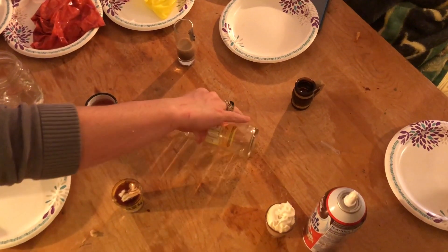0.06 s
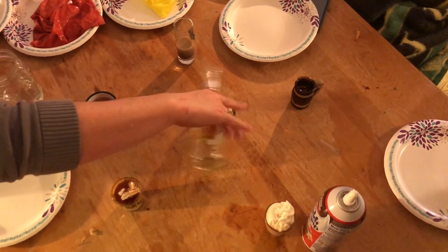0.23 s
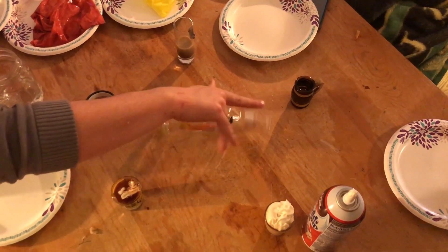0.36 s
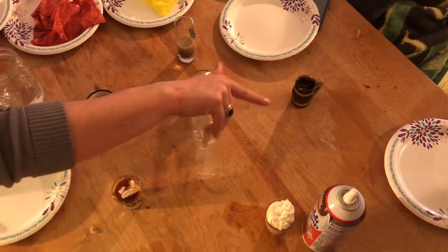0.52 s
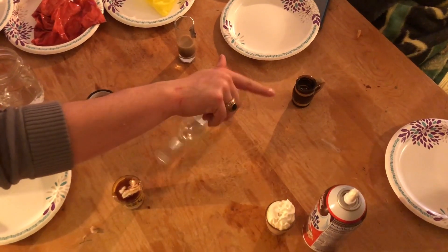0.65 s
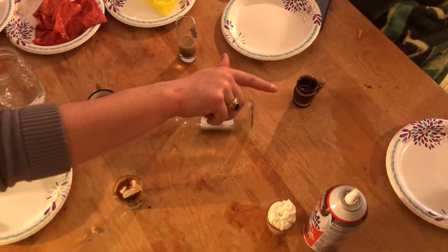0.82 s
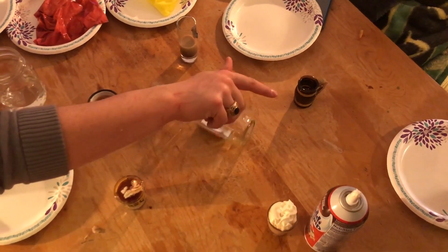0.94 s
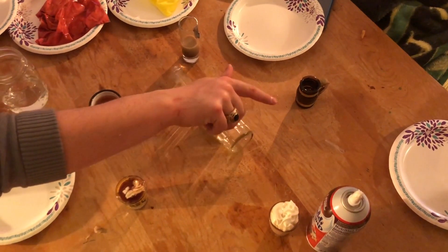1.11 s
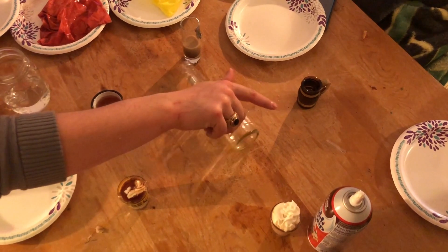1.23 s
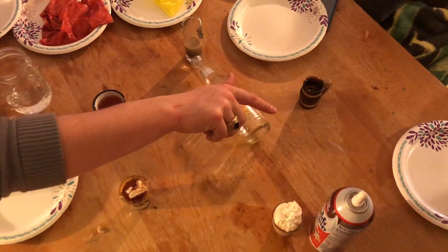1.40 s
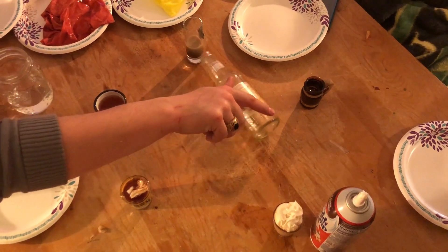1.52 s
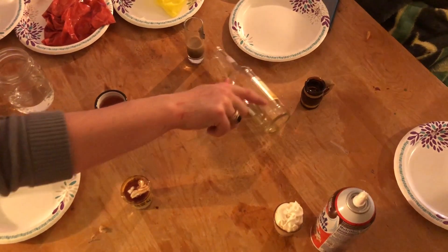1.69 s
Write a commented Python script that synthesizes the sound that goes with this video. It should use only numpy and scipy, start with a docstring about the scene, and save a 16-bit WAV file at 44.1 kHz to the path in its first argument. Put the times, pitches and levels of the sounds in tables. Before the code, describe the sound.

A glass bottle spins on its side on a wooden table, heard close in mono. After a nearly silent 0.2 seconds, a hollow woody rumble bursts in with dense irregular knocks, dry scraping and faint high glass ticks, strongest from 0.27 to 0.85. It weakens around 0.95 to 1.1, then nearly stops; soft low rocking bumps return near 1.4 and 1.6 over quiet room hush.

```python
"""Bottle spinning on a table

A glass bottle spins on its side on a wooden table in a quiet room, heard close by on one microphone.
Tiny bumps of the contact shake the tabletop's modes into a rumble and make the glass ring faintly
in close pairs and groups; grit scrapes and fizzes under it. Harder knocks and ticks, short clicks into
the same modes with a burst of noise, stand out, and the bottle rocks on softly as it slows."""
import sys
import numpy as np
from scipy import signal
from scipy.fft import rfft, irfft
from scipy.io import wavfile

SR = 44100
rng = np.random.default_rng(int(sys.argv[2]) if len(sys.argv) > 2 else 0)


def amplitude_ratio(level_db):
    """Convert a level in decibels to the matching linear amplitude (field) ratio."""
    exponent = np.asarray(level_db, float) / 20
    return 10 ** exponent


def generate_wav(signal):
    """Clip the signal to [-1, 1] and save it as 16-bit WAV at the path in sys.argv[1]."""
    frames = np.transpose(np.atleast_2d(signal))
    scaled = np.clip(frames, -1, 1) * 32767
    pcm = np.round(scaled).astype(np.int16)
    wavfile.write(sys.argv[1], SR, pcm)


N = 77175  # samples, 1.75 s


def evened(x):
    """Scales a signal to rms 1."""
    return x / np.sqrt(np.mean(x ** 2) + 1e-20)


def curve(table, col):
    """Gain over time from a dB column, straight lines in dB between rows."""
    rows = np.array(table)
    return amplitude_ratio(np.interp(np.arange(N) / SR, rows[:, 0], rows[:, col]))


def resonate(x, hz, width):
    """Two-pole resonance, bandwidth in Hz, whose ring starts with amplitude 1 for a unit click."""
    r = np.exp(-np.pi * width / SR)
    w = 2 * np.pi * hz / SR
    return signal.lfilter([0, np.sin(w) * r], [1, -2 * r * np.cos(w), r * r], x)


def bandpass(x, order, hz):
    """Butterworth band between two frequencies."""
    return signal.sosfilt(signal.butter(order, hz, "band", fs=SR, output="sos"), x)


def coloured(x, points):
    """Filters x by a spectrum drawn through (Hz, dB) points on a log frequency axis."""
    f, db = np.transpose(points)
    log_f = np.log(np.fft.rfftfreq(N, 1 / SR) + 1)
    return irfft(rfft(x) * amplitude_ratio(np.interp(log_f, np.log(f + 1), db)), N)


def bumps(per_s, spread_db):
    """Sparse clicks at random times, of random sign, a few of them large; rms 1."""
    size = amplitude_ratio(spread_db * np.minimum(rng.exponential(1, N), 3))
    sign = rng.choice([-1., 1.], N)
    return evened(size * sign * (rng.random(N) < per_s / SR))


def drift(db, hz):
    """Wandering gain of mean power 1: swings of db rms, no faster than hz."""
    t = np.arange(0, N + 128, 128) / SR
    wave = sum(np.sin(2 * np.pi * (f * t + rng.random())) for f in np.geomspace(hz / 4, hz, num=12))
    return evened(amplitude_ratio(db * np.interp(np.arange(N) / SR, t, evened(wave))))


def hits(table, col=None):
    """One click for each (s, dB) row, its dB raised by column col if given."""
    out = np.zeros(N)
    for row in table:
        out[round(row[0] * SR)] = amplitude_ratio(row[1] + (row[col] if col else 0))
    return out


def burst(db, t60, hz):
    """Noise that dies away by 60 dB in t60 s; db is its starting level before the part outside hz is cut."""
    t = np.arange(3000) / SR
    return bandpass(rng.standard_normal(len(t)), 4, hz) * amplitude_ratio(db - 60 * t / t60)


def noise_bursts(clicks, db, t60, hz):
    """A fresh noise burst at each (s, dB) click."""
    return sum(signal.oaconvolve(hits([click]), burst(db, t60, hz))[:N] for click in clicks)


# Hush of the empty room at the microphone, relative spectrum: f/Hz, level/dB
ROOM_SPECTRUM = [(25, -17), (105, 4.5), (369, -0.5), (479, 1), (800, -14), (2200, -17.5), (4910, -25.5),
                 (15500, -38)]


def room_hush():
    """Steady noise of the quiet room, -55 dB rms."""
    return amplitude_ratio(-55) * evened(coloured(rng.standard_normal(N), ROOM_SPECTRUM))


# Rolling contact on the wood: t/s, favoured rumble pitch f/Hz, then drive level/dB of
# rumble 200-400 Hz, boards 400-900 Hz, hard contact 900-2000 Hz, scrape, sharp board mode
ROLL_LEVELS = [(0.0, 295, -53, -45, -65, -64, -52), (0.106, 324, -76, -74, -68, -84, -71),
               (0.185, 318, -42.5, -41.5, -54, -56.5, -72), (0.213, 306, -39.5, -46, -42, -48.5, -29),
               (0.272, 295, -28.5, -25.5, -33, -48.5, -30.5), (0.34, 259, -29, -32, -31, -56.5, -45),
               (0.4, 298, -27, -31, -39.5, -51.5, -35), (0.445, 270, -27, -30, -44, -56, -40.5),
               (0.506, 314, -32, -30.5, -46, -47.5, -22), (0.536, 310, -25, -29, -28, -52, -28.5),
               (0.574, 305, -47, -42, -33.5, -46, -32), (0.598, 310, -27.5, -43, -34, -36.5, -38),
               (0.652, 289, -29.5, -33, -33.5, -50, -44), (0.726, 259, -25.5, -34.5, -35.5, -58, -34),
               (0.765, 280, -25, -32, -47, -49, -49), (0.818, 244, -23, -28, -36.5, -77, -37),
               (0.872, 286, -35.5, -38, -55, -64, -65), (0.978, 342, -33, -38, -42.5, -59, -68),
               (1.03, 336, -36.5, -41, -58, -65, -66), (1.09, 317, -44, -46, -54.5, -63.5, -53),
               (1.276, 274, -53.5, -62, -65.5, -73, -70), (1.39, 262, -32, -60, -53, -63, -50),
               (1.45, 269, -50.5, -53.5, -62, -72, -74), (1.53, 275, -41.5, -62, -61, -72, -79),
               (1.584, 250, -40, -58, -69, -69, -64), (1.628, 287, -45.5, -52, -66, -67.5, -59),
               (1.75, 248, -39, -62.5, -75, -66.5, -54)]
# Knocks of bottle on wood, before each part's own trim: t/s, level/dB, hard part relative to it level/dB
KNOCK_HITS = [(0.201, -27.5, 0), (0.215, -18, -19), (0.26, -21.5, -18), (0.312, -15, -6.5),
              (0.37, -27.5, -22), (0.409, -20, -9), (0.452, -19, -15.5), (0.517, -15.5, -16),
              (0.531, -13.5, -6), (0.548, -31.5, 5), (0.557, -24, 0.5), (0.584, -22.5, 2),
              (0.605, -25.5, -14), (0.626, -30, 7.5), (0.643, -18, -8), (0.732, -20, -5),
              (0.793, -21, -1.5), (0.946, -24, -10), (1.361, -30.5, -12), (1.399, -32, -18)]
# Tabletop modes, deep to hard and one sharp: f/Hz, width f/Hz, relative level/dB
BASS_MODES = [(105.3, 25, 0), (165.3, 11, 0.01)]
RUMBLE_MODES = [(241, 20, -2), (268, 24, 0), (292, 24, 0), (320, 22, 0), (352, 26, -2)]
BOARD_MODES = [(430, 34, -15), (541, 23, -0.5), (578.3, 23.5, 0), (641.7, 44.7, 6), (683.3, 18, 0),
               (742.7, 28.4, 3), (858.4, 25.7, 1)]
HARD_MODES = [(888.6, 27.4, 8), (1002, 42, 7), (1129.6, 30.5, 2.5), (1203, 24, -8.5), (1440, 13, -8.5),
              (1656, 44, -7), (2120, 80, -4)]
SHARP_MODE = [(465, 18, -8)]
# Column of the rolling levels that drives each of these five groups
GROUP_COLUMNS = (2, 2, 3, 4, 6)
# A bump is a soft push: each group is heard mainly inside its band: low edge f/Hz, high edge f/Hz
GROUP_BANDS = ((85, 160), (232, 440), (382, 1227), (683, 1930), (347, 657))


def board_modes():
    """Bumps and knocks ring the boards; the moving contact swells each mode and favours one rumble pitch."""
    rough = bumps(per_s=900, spread_db=4)
    body, hard = hits(KNOCK_HITS), hits(KNOCK_HITS, col=2)
    favoured_hz = np.interp(np.arange(N) / SR, *np.array(ROLL_LEVELS).T[:2])
    reach_hz, knock_spread_s = 43, 0.001496
    groups = (BASS_MODES, RUMBLE_MODES, BOARD_MODES, HARD_MODES, SHARP_MODE)
    knocks = (body, body, body, hard, body)
    out = np.zeros(N)
    for col, modes, knock, band_hz in zip(GROUP_COLUMNS, groups, knocks, GROUP_BANDS):
        favoured = modes is RUMBLE_MODES
        share = [np.exp(-((f - favoured_hz) / reach_hz) ** 2) if favoured else 1 for f, _, _ in modes]
        drive = [rough * drift(db=3, hz=11) * part for part in share]
        norm = np.std(sum(amplitude_ratio(db) * resonate(d, f, width) for d, (f, width, db) in zip(drive, modes)))
        bass_trim = amplitude_ratio(-9.5 * (modes is BASS_MODES))
        level = curve(ROLL_LEVELS, col) / norm * bass_trim
        blow = amplitude_ratio(-8) * knock / np.sqrt(len(modes))
        # a knock reaches each mode a little late, by a random part of the spread
        late = (rng.random(len(modes)) * knock_spread_s * SR).astype(int)
        rung = np.zeros(N)
        for d, lag, part, (f, width, db) in zip(drive, late, share, modes):
            push = d * level + np.roll(blow, lag) * part
            rung += amplitude_ratio(db) * resonate(push, f, width)
        out += bandpass(rung, 2, band_hz)
    return out


def knock_edges():
    """Dry edge of each knock: a short burst of noise as loud as its hard part asks."""
    hard_clicks = [(s, db + hard_db) for s, db, hard_db in KNOCK_HITS]
    return noise_bursts(hard_clicks, db=-14, t60=0.036, hz=(910, 3730))


def tabletop():
    """Ringing boards and knock edges, cut steeply below 103.7 Hz."""
    low_cut = signal.butter(5, 103.7, "high", fs=SR, output="sos")
    return signal.sosfilt(low_cut, board_modes() + knock_edges())


# Scrape on the varnish, relative spectrum: f/Hz, level/dB
SCRAPE_SPECTRUM = [(880, -1), (1500, 10), (2230, 0), (3800, -12.5), (4680, -14.5), (6240, -44),
                   (15000, -51)]


def scrape(grit):
    """Grit dragged over the varnish: coloured clicks that follow the roll."""
    return curve(ROLL_LEVELS, col=5) * evened(coloured(grit, SCRAPE_SPECTRUM))


# Bottle glass: t/s, then level/dB of the pair at 3.2 kHz, group at 5 kHz, group at 7 kHz,
# modes above 9 kHz, fizz between the rings
RING_LEVELS = [(0.15, -92, -77, -89, -80, -72.5), (0.228, -68, -71, -60.5, -65.5, -66),
               (0.326, -52.5, -59, -68.5, -64, -61), (0.398, -54, -68.5, -56, -57.5, -77),
               (0.424, -53, -60.5, -72, -71, -77), (0.49, -62, -65, -69, -63, -61),
               (0.525, -87, -66, -69, -72, -77), (0.54, -44.5, -69, -70, -70, -59.5),
               (0.6, -89.5, -62, -67, -61, -63.5), (0.64, -50, -58, -65, -62, -85),
               (0.68, -62, -60, -69, -74, -60.5), (0.726, -61, -57.5, -61, -60, -64),
               (0.8, -58, -72, -62, -68, -73), (0.85, -64.5, -72, -77, -73.5, -69),
               (0.916, -68, -78, -79, -78, -79), (0.926, -63, -75, -77, -66.5, -91),
               (1.032, -70, -77, -74.5, -72, -71.5), (1.286, -78, -81, -86, -80, -82),
               (1.602, -83, -102, -92, -81, -84), (1.618, -62, -81, -64.5, -70, -76),
               (1.66, -93, -80, -93, -81, -80)]
# Fizz of the grit, relative spectrum: f/Hz, level/dB
FIZZ_SPECTRUM = [(2000, -39), (3500, 3.5), (7500, 3), (15500, -6.5)]


def fizz(grit):
    """The same grit heard high up, in clumps: its gain wanders at up to 60 Hz."""
    clumps = drift(db=5.5, hz=60.07)
    return curve(RING_LEVELS, col=5) * clumps * evened(coloured(grit, FIZZ_SPECTRUM))


# Pitches of the glass modes, one row per group: f/Hz
GLASS_PITCHES = [
    [3220, 3267],
    [5035, 5110, 5350],
    [6880, 7120, 7600, 7670],
    [9220, 9380, 9780, 10900, 11700, 11900, 13450, 13550, 14600, 14900, 15650],
]
# The same modes in the same order: relative level/dB, fall by 60 dB t/s
GLASS_MODES = [
    [(-5, 0.069), (0.5, 0.11)],
    [(-10, 0.068), (-2.5, 0.13), (-3.5, 0.03)],
    [(-5, 0.029), (-6, 0.083), (-5, 0.048), (-6.5, 0.058)],
    [(-4.5, 0.041), (-13.5, 0.09), (-8, 0.037), (-6, 0.051), (-7.5, 0.06), (-4, 0.035), (-4, 0.023),
     (-1.5, 0.035), (-9, 0.049), (2.5, 0.023), (-30, 0.047)],
]
# Ticks on the glass, before each part's own trim: t/s, level/dB
TICK_HITS = [(0.2416, -48), (0.34, -68), (0.4481, -51), (0.4945, -50), (0.7163, -54), (0.9219, -52.5),
             (1.0041, -60.5), (1.6152, -66)]
# One glass mode struck alone: t/s, f/Hz, level/dB before that mode's own
PING_HITS = [(0.326, 3267, -57), (0.531, 3267, -55), (0.796, 3267, -54), (0.621, 5110, -47),
             (0.63, 5110, -50), (0.924, 5110, -53)]


def glass(rubbing):
    """Rubbing, ticks and pings ring the bottle; turning shifts the weight between modes."""
    out = np.zeros(N)
    for col, (pitches, modes) in enumerate(zip(GLASS_PITCHES, GLASS_MODES), start=1):
        parts = []
        for hz, (db, t60) in zip(pitches, modes):
            width = np.log(1000) / np.pi / t60
            parts.append((hz, width, db, rubbing * drift(db=2, hz=14)))
        norm = np.std(sum(amplitude_ratio(db) * resonate(drive, hz, width) for hz, width, db, drive in parts))
        level = curve(RING_LEVELS, col) / norm
        # each tick strikes each mode with its own luck, 4.5 dB spread
        luck_db = 4.5 * rng.standard_normal((len(TICK_HITS), len(parts)))
        for (hz, width, db, drive), mode_luck in zip(parts, luck_db.T):
            ticks = [(s, peak - 9 + luck) for (s, peak), luck in zip(TICK_HITS, mode_luck)]
            pings = [(s, peak) for s, ping_hz, peak in PING_HITS if ping_hz == hz]
            out += amplitude_ratio(db) * resonate(drive * level + hits(ticks + pings), hz, width)
    return out


def tick_snaps():
    """Snap of each tick: a brief burst of treble noise."""
    return noise_bursts(TICK_HITS, db=-2, t60=0.024, hz=(5100, 12100))


def echoes(x):
    """Sparse reflections of the room, of random sign, dying away by 60 dB in 0.27 s."""
    taps = np.zeros(SR // 2)
    at = np.arange(200, len(taps) - 20, 20)  # one in every 20 samples, from 4.5 ms on
    taps[at + rng.integers(0, 20, len(at))] = rng.choice([-1., 1.], len(at))
    taps *= amplitude_ratio(-60 * np.arange(len(taps)) / SR / 0.27)
    return signal.fftconvolve(x, taps / np.linalg.norm(taps))[:N]


def scene():
    """Bottle and table close by, their echoes 10.5 dB down, and the room hush, in mono."""
    grit = bumps(per_s=3600, spread_db=5)
    near = tabletop() + scrape(grit) + fizz(grit)
    rubbing = bumps(per_s=3600, spread_db=5.5)
    near += glass(rubbing) + tick_snaps()
    hush = room_hush()
    return (near + amplitude_ratio(-10.5) * echoes(near) + hush)[None]


def roll_off(x):
    """The treble ends steeply here."""
    return signal.sosfilt(signal.butter(12, 15900, fs=SR, output="sos"), x)


def record(dry):
    """Delivers the finished mix."""
    return roll_off(dry)


dry = scene()
out = record(dry)
generate_wav(out)
```